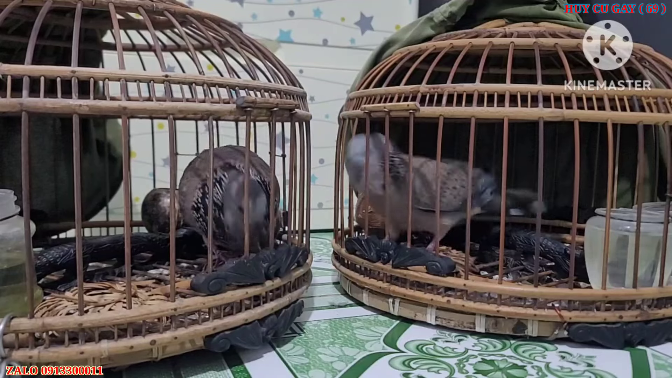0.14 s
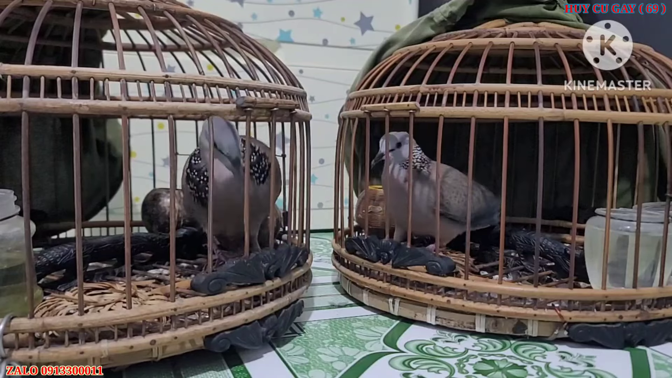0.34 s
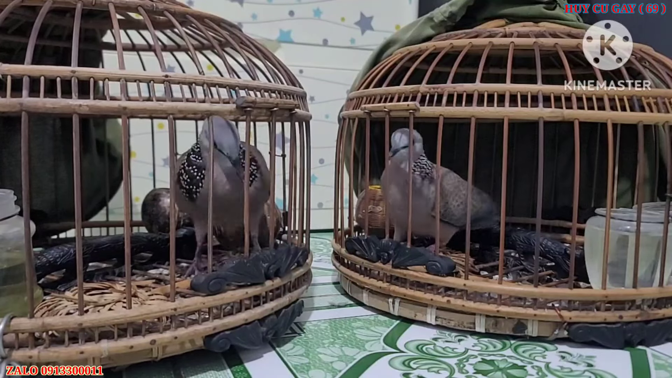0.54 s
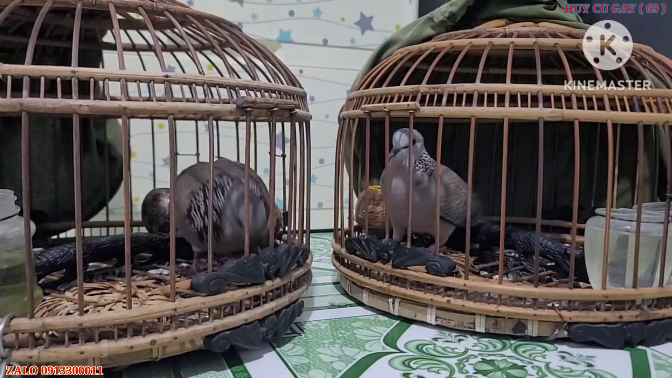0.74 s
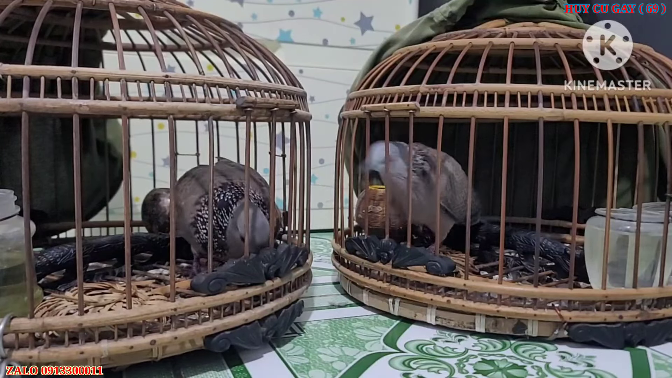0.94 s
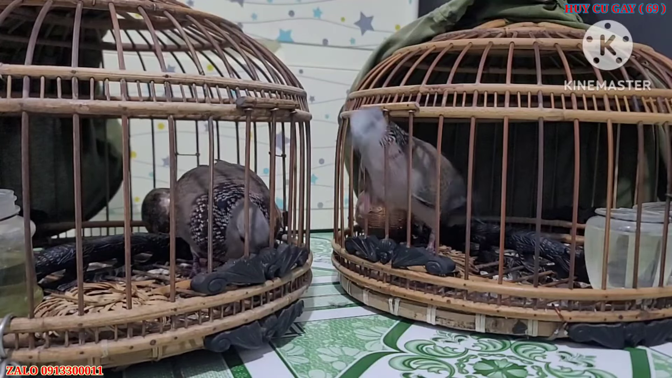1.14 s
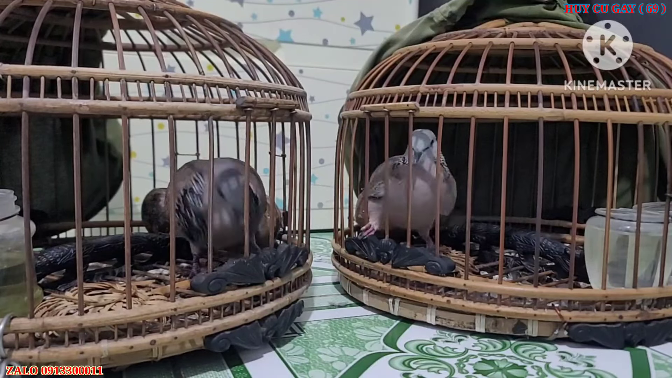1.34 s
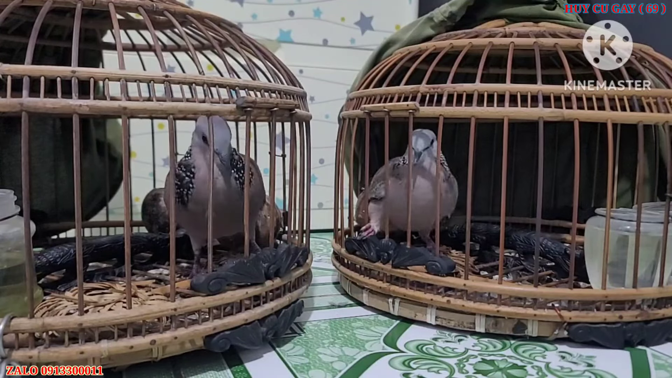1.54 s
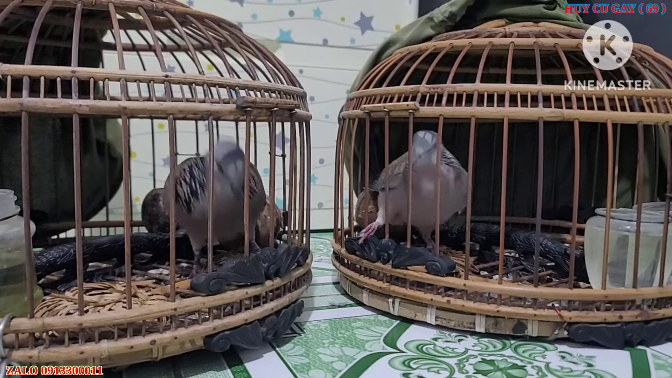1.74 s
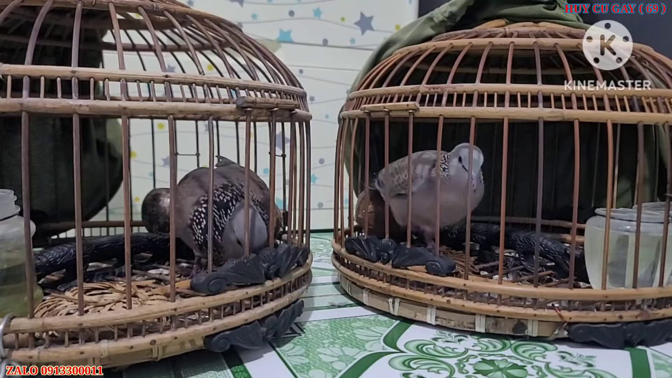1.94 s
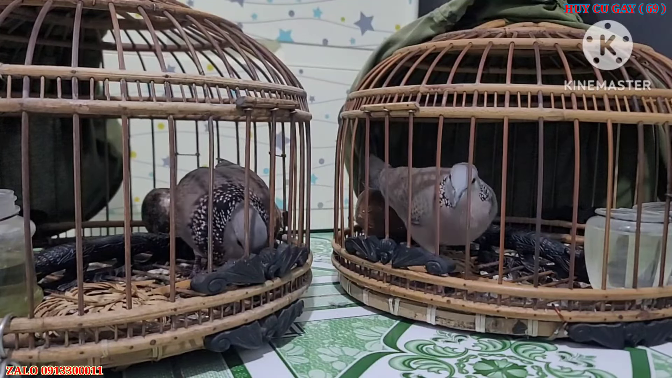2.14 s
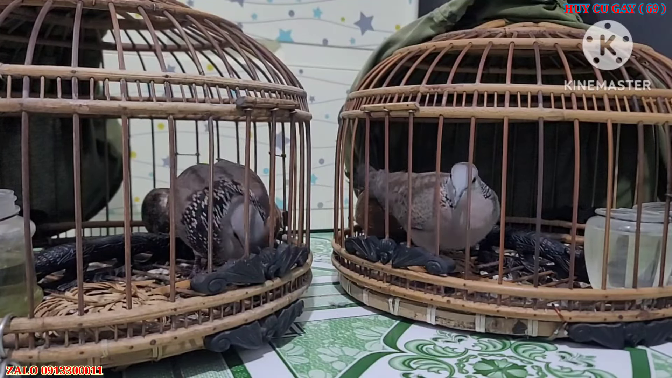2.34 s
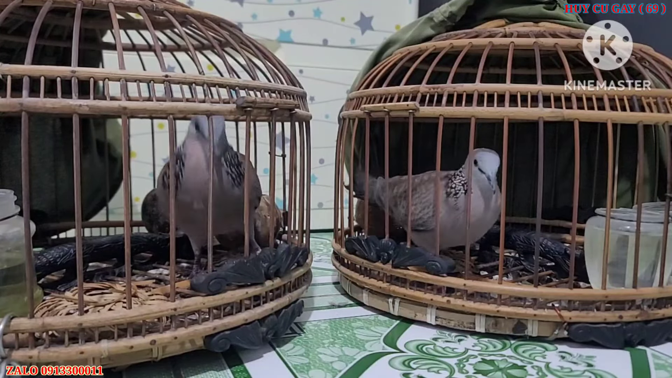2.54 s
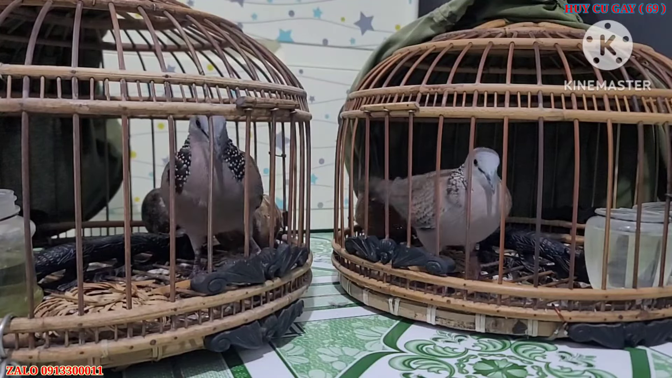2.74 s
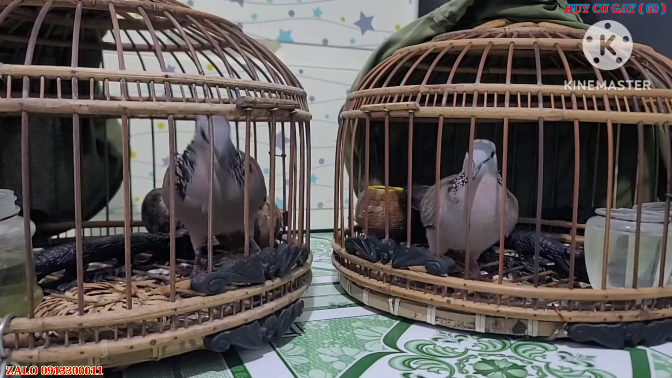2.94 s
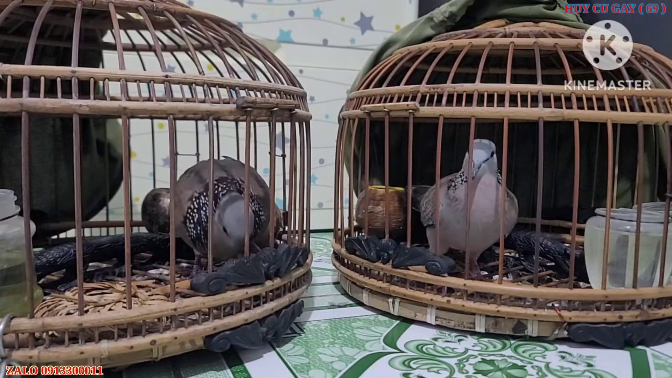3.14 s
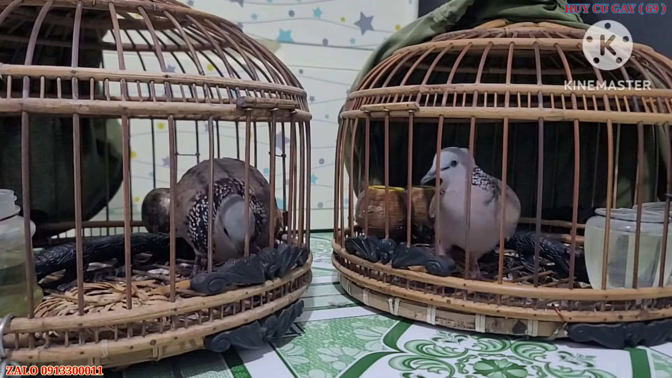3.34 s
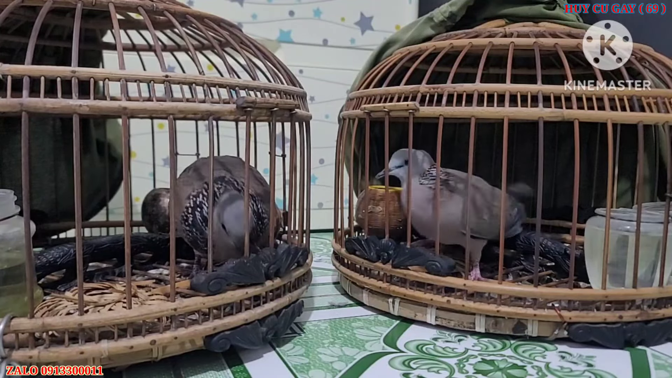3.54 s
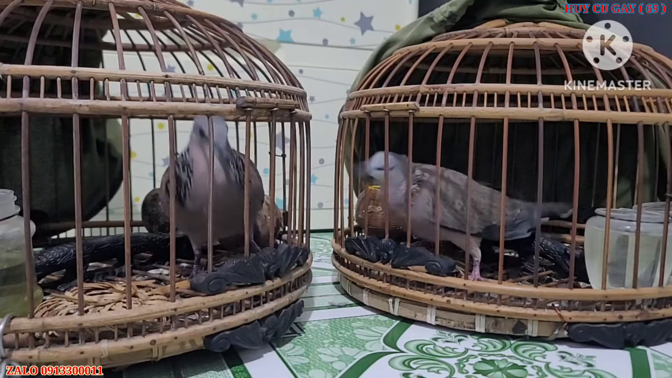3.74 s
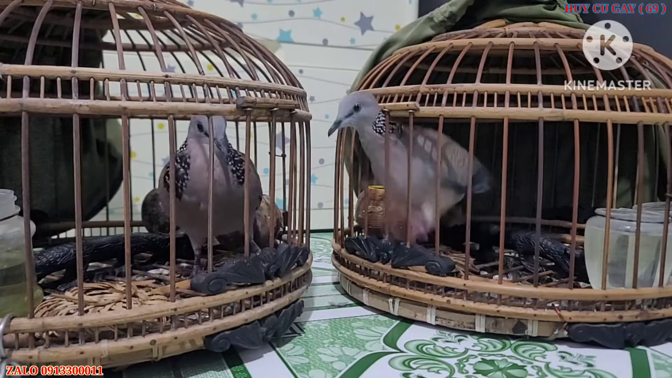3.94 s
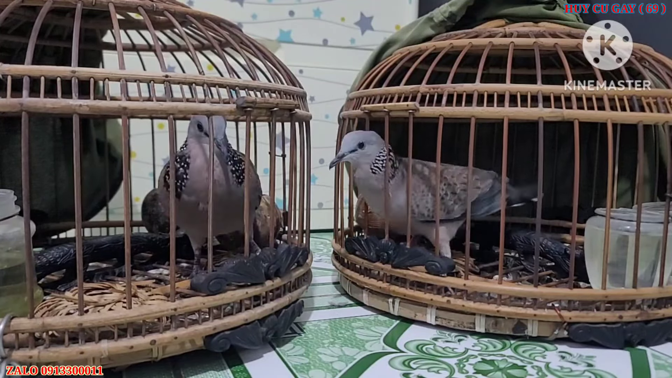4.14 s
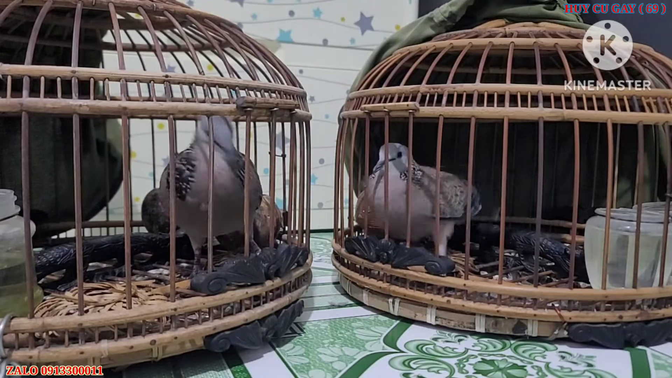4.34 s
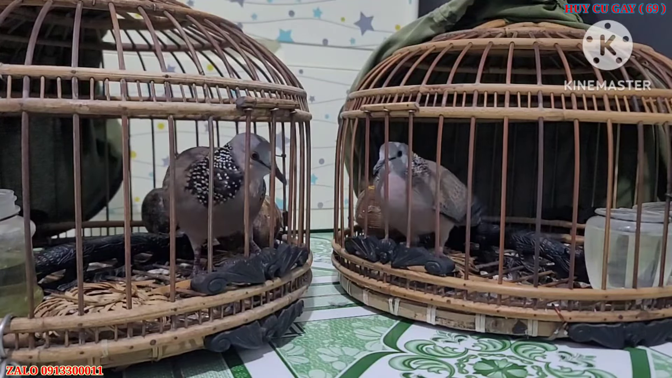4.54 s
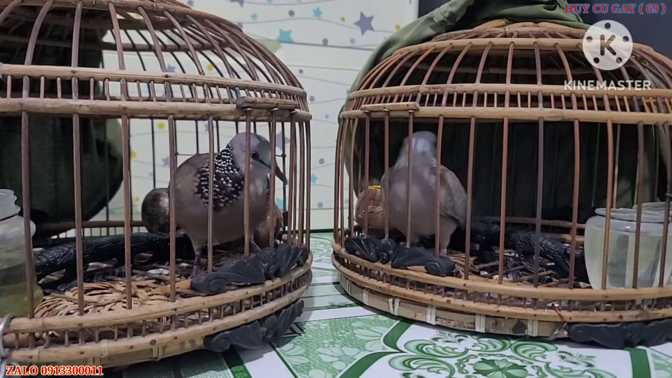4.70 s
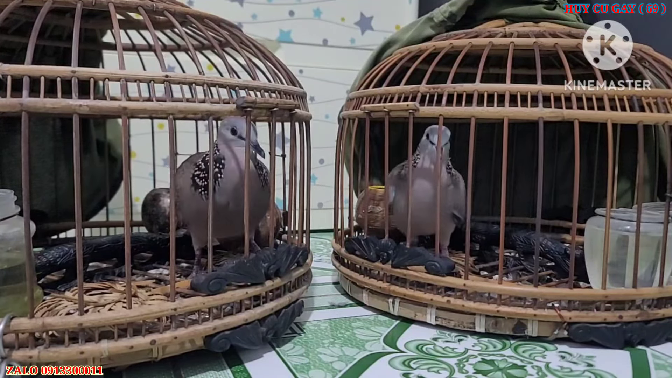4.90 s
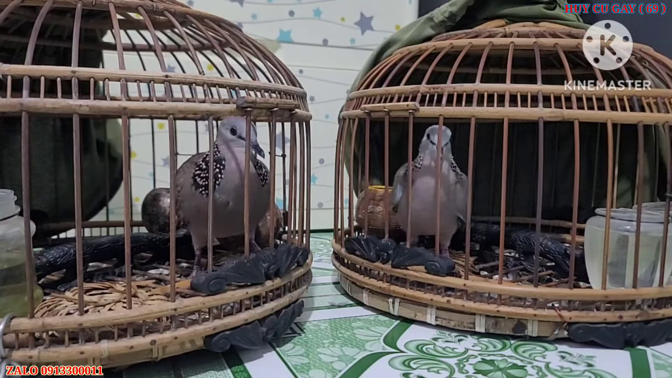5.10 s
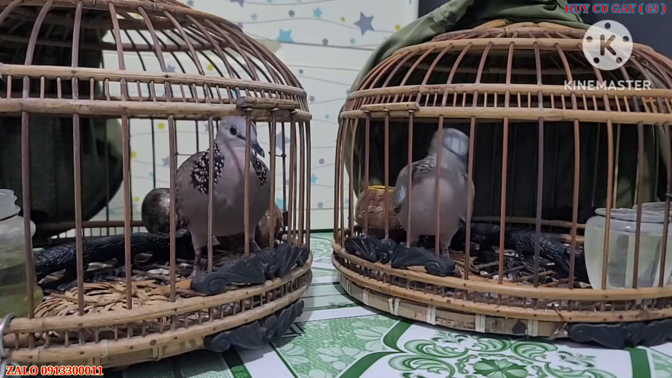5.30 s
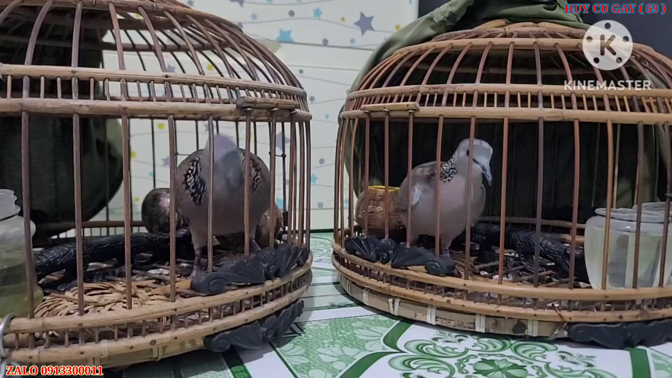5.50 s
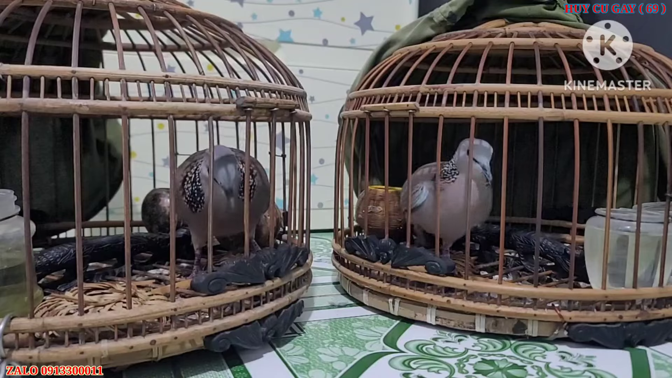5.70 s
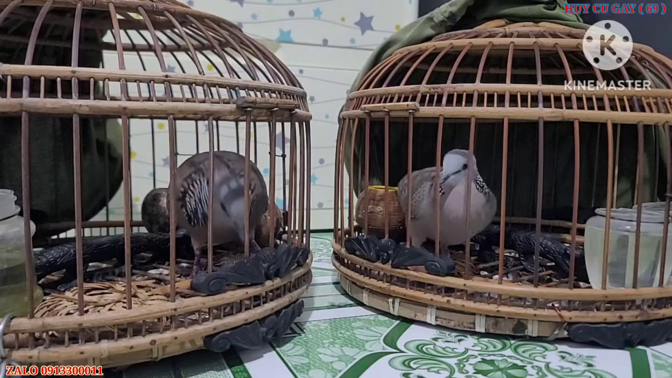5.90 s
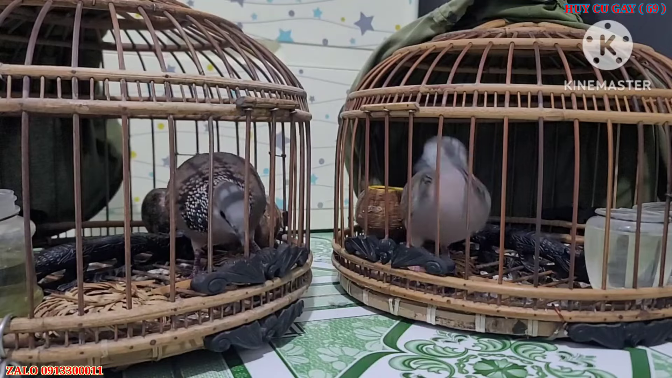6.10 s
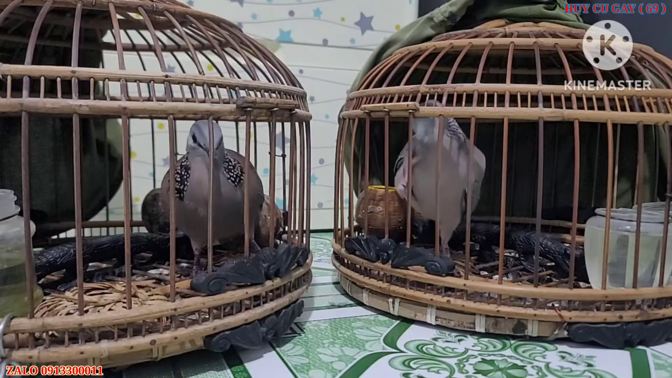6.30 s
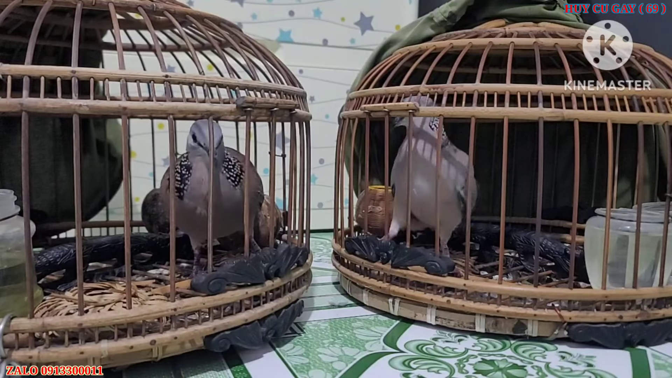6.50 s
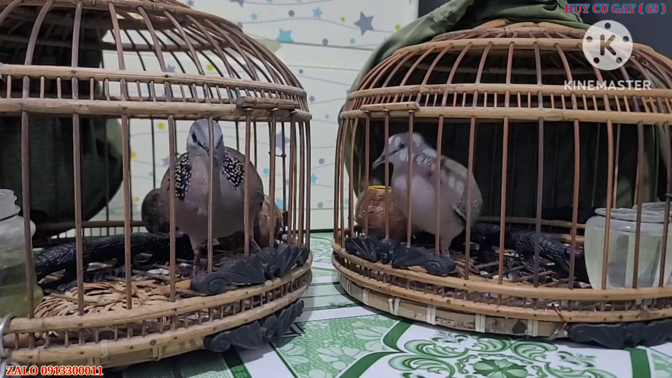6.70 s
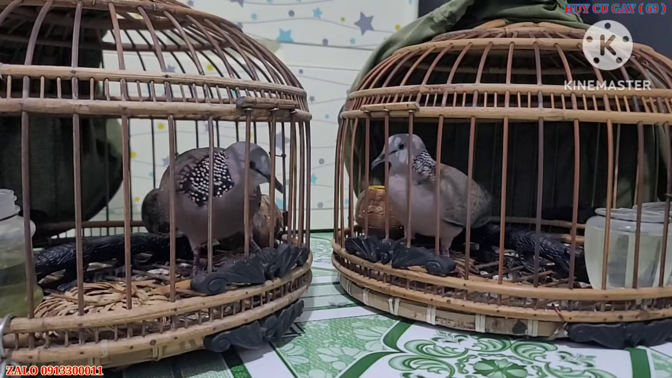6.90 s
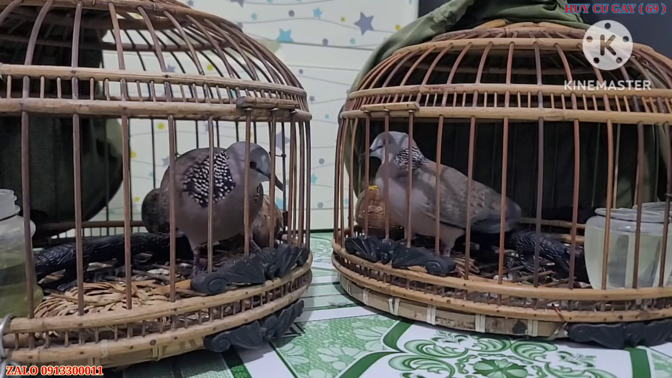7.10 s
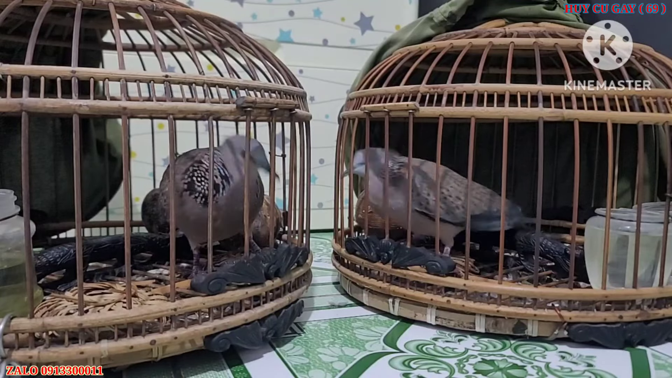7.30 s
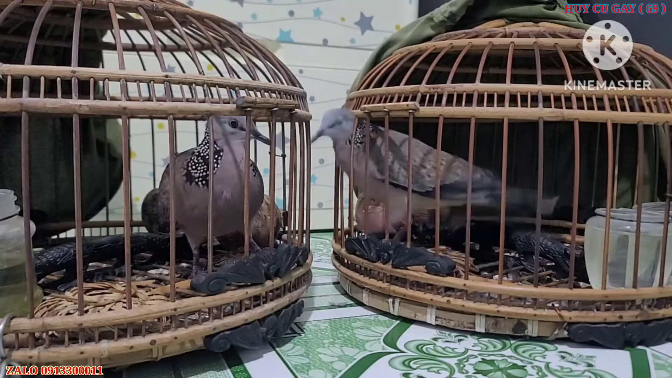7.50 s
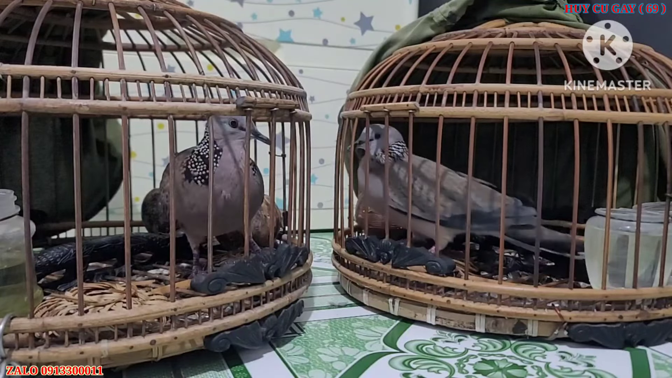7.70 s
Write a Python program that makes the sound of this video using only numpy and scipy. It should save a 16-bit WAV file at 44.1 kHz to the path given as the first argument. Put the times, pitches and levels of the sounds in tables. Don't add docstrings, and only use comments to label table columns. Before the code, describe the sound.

Close throaty dove coos, short then long and falling, give way to claw ticks, feather rustle and indoor knocks over faint motor hum and whine.

```python
import sys
import numpy as np
from scipy import signal
from scipy.fft import rfft, irfft, next_fast_len
from scipy.io import wavfile

SR = 44100
rng = np.random.default_rng(int(sys.argv[2]) if len(sys.argv) > 2 else 0)


def ratio(d):
    e = np.asarray(d, float) / 20
    return 10 ** e


def int16_out(signal):
    q = np.round(np.clip(np.atleast_2d(signal).T, -1, 1) * 32767)
    wavfile.write(sys.argv[1], SR, q.astype(np.int16))


N = 341769
T = np.arange(N) / SR

PURR_DEPTH, EDGE_DEPTH, SCOOP_S = .94, .6, .028
ATTACK_S, RELEASE_S, SILENT_DB = .013, .016, -36.5


def rms_one(x):
    return x / np.sqrt(np.mean(x ** 2) + 1e-20)


def in_time(rows):
    s, *columns = np.transpose(rows)
    return [np.interp(T, s, c) for c in columns]


def at_hz(points, hz):
    point_hz, value = np.transpose(points)
    return np.interp(np.log(hz + 1), np.log(point_hz), value)


def gate(start, end, rise=.011, fall=.0052):
    ramp = np.minimum((T - start) / rise + .5, (end - T) / fall + .5)
    return np.sin(np.pi / 2 * np.clip(ramp, 0, 1)) ** 2


def drift(rate):
    r = np.exp(-80 * np.pi * rate / SR)
    slow = signal.lfilter([1], [1, -2 * r, r * r], rng.standard_normal(N // 40 + 2002))[2000:]
    return np.interp(np.arange(N) / 40, np.arange(len(slow)), rms_one(slow))


def resonance(x, hz, width_hz):
    r = np.exp(-np.pi * width_hz / SR)
    zeros = np.array([1, 0, -1]) * (1 - r * r) / 2
    poles = [1, -2 * r * np.cos(2 * np.pi * hz / SR), r * r]
    return signal.lfilter(zeros, poles, x)


def band(x, low_hz, high_hz, order=2):
    return signal.sosfilt(signal.butter(order, [low_hz, high_hz], "band", fs=SR, output="sos"), x)


def diffuse(gain_of_hz):
    # freq_hz, likeness (0-1)
    likeness = [(60, 0.99), (215, 0.98), (300, 0.81), (640, 0.39), (1410, -0.0), (3100, 0.16),
                (6820, -0.05), (15000, 0.03)]
    size = next_fast_len(N)
    hz = np.arange(size // 2 + 1) * SR / size
    mid, side = rfft(rng.standard_normal((2, size)))
    alike = np.clip(at_hz(likeness, hz), 0, .999)
    pair = np.sqrt(1 + alike) * mid + np.sqrt(1 - alike) * side * [[1], [-1]]
    return rms_one(irfft(pair * gain_of_hz(hz), size)[:, :N])


def dove():
    # start_s, end_s, pitch_hz, first_pitch_hz, level_db
    short_notes = [
        (0.771, .968, 794.4, 570, -18.5),
        (1.9, 2.074, 789.7, 830, -18),
        (3.114, 3.299, 794, 545, -18.5),
    ]
    # start_s, purr_clears_s, voice_breaks_s, end_s, pitch_hz
    long_notes = [
        (-.06, 0.063, 0.25, 0.33, 852.5),
        (1.065, 1.193, 1.357, 1.419, 836.3),
        (2.175, 2.297, 2.459, 2.525, 833.6),
        (3.396, 3.584, 3.702, 3.731, 830.4),
    ]
    # time_s, depth (0-1)
    catches = [(0.104, 0.24), (.114, 0.91), (0.131, 0.89), (0.15, 1), (.165, 0.27), (0.18, 0.96),
               (.197, 0.75), (.215, 0.31), (0.259, .5), (.299, 0.99), (1.21, 0.42), (1.227, 1),
               (1.254, 0.84), (1.295, 0.73), (1.396, 0.5), (2.327, 0.96), (2.346, 0.7), (2.375, 0.97),
               (2.409, 1), (2.505, 0.32), (3.601, 0.39), (3.618, 0.73), (3.638, 0.47), (3.66, 0.87)]
    breaks = [(row[2], .45) for row in long_notes]
    catch_s, catch_depth = np.transpose(list(catches) + breaks)
    notes = [short_note(*row) for row in short_notes] + [long_note(*row) for row in long_notes]
    out, overtone, wobble = np.zeros(N), np.zeros(N), drift(60)
    for voice, effort in notes:
        tone, octave = syrinx(voice, effort, catch_s, catch_depth, wobble)
        out += tone
        overtone += octave
    already_singing = np.concatenate([out[999:0:-1], out])
    throat = resonance(band(already_singing, 430, 940, order=3), 734, 800)
    ahead = 110
    return np.pad(throat[999 + ahead:], (0, ahead)) + resonance(overtone, 910, 600)


def syrinx(voice, effort, catch_s, catch_depth, wobble):
    sag, regain_s, open_s, close_s = .37, .0047, .0017, .0025
    unsteady, spread_db, overtone_db = .2, 1.2, -40.5
    pitch, per_s, depth = in_time(voice)
    start, end = voice[0][0], voice[-1][0]
    turns = np.cumsum(per_s * (1 + unsteady * wobble)) / SR
    purr = np.flatnonzero(np.diff(np.floor(turns), prepend=-1))
    purr = purr[(T[purr] > start) & (T[purr] < end) & (depth[purr] > .15)]

    uneven = rng.uniform(.85, 1.2, 99)
    at = np.concatenate([[-9], T[purr], catch_s, [99]])
    deep = np.concatenate([[0], depth[purr] * uneven[:len(purr)], catch_depth, [0]])
    order = np.argsort(at)
    at, deep = at[order], np.clip(deep[order], 0, 1)
    last = np.searchsorted(at, T, side="right") - 1
    since, until = T - at[last], at[last + 1] - T
    opening = 1 - deep[last] * np.exp(-(since / open_s) ** 2)
    closing = 1 - deep[last + 1] * np.exp(-(until / close_s) ** 2)

    strength_db, detune = rng.standard_normal((2, 99))[:, last % 99]
    flat = sag * (.55 + .5 * depth) * deep[last]
    climb = 1 - flat * np.exp(-(since / regain_s) ** 1.5) + .04 * depth * np.clip(detune, -2, 1)
    phase = 2 * np.pi * np.cumsum(pitch * climb) / SR
    purr_db = depth * (4.5 + spread_db * strength_db)
    loud = ratio(in_time(effort)[0] + 5.5 + purr_db) * opening * closing * gate(start, end)
    return loud * np.cos(phase), loud * ratio(overtone_db + 10 * depth) * np.sin(2 * phase)


def short_note(start, end, hz, first_hz, db):
    rate, fall_s, swell_db = 102, .022, 4
    long = end - start
    voice = [(start, first_hz, rate, EDGE_DEPTH),
             (start + SCOOP_S, hz, rate, PURR_DEPTH),
             (start + .45 * long, hz, rate, PURR_DEPTH),
             (start + .65 * long, hz * 1.02, rate, EDGE_DEPTH),
             (end - fall_s, hz * .97, rate, EDGE_DEPTH),
             (end, hz * .74, rate, EDGE_DEPTH)]
    effort = [(start, SILENT_DB), (start + ATTACK_S, db - swell_db / 2),
              (end - RELEASE_S, db + swell_db / 2), (end, db - 3.5)]
    return voice, effort


def long_note(start, clears, breaks, end, hz):
    slow, fast = 70, 88
    switch_s, last_fall_s, clear_swell_s = .01, .025, .024
    droop_hz, droop_s, droop_power = 145.2, .295, 2.5
    s = np.arange(start + SCOOP_S, breaks - switch_s / 2, .005)
    droop = hz - droop_hz * ((s - start) / droop_s) ** droop_power
    rate = np.interp(s, [start, start + 2 * SCOOP_S], [slow, fast])
    depth = PURR_DEPTH - .12 * ((s - start) / (clears - start)) ** 2
    depth = depth * np.clip((clears - s) / switch_s + .5, 0, 1)
    depth = np.maximum(depth, .17)
    low = breaks + switch_s / 2
    voice = [(start, hz * .72, slow, EDGE_DEPTH),
             *zip(s, droop, rate, depth),
             (low, 632, slow, 0),
             (max(end - last_fall_s, low + .00064), 600, slow, 0),
             (end, 455, slow, 0)]
    clear_s = clears + clear_swell_s
    effort = [(start, SILENT_DB), (start + ATTACK_S, -19), (clears, -16),
              (clear_s, -11), (max(breaks - .06, clear_s + .001), -14),
              (breaks - .022, -10), (breaks - switch_s / 2, -10),
              (low, -14), (end - RELEASE_S, -19.5), (end, SILENT_DB)]
    return voice, effort


def wheeze():
    # start_s, length_s, first_pitch_hz, fall_hz_per_s, peak_db
    breaths = [
        (1.118, 0.24, 9250, 2600.5, -64),
        (2.219, 0.25, 9050, 2304, -63.5),
        (3.433, .2, 9050, 2298.5, -61.5),
        (7.596, 0.33, 7880, -800, -63),
    ]
    out, flutter = np.zeros(N), 1 + .012 * drift(80)
    for s, long, hz, fall, db in breaths:
        pitch = hz - fall * np.clip(T - s, 0, long)
        level_db = db - 10 * np.minimum(abs(2 * (T - s) / long - 1), 1)
        tone = np.sin(2 * np.pi * np.cumsum(pitch * flutter) / SR)
        out += ratio(level_db) * gate(s, s + long) * tone
    return out * (1 + .8 * drift(60))


def murmurs():
    # start_s, length_s, pitch_hz, level_db
    throat_sounds = [
        (2.862, 0.08, 380, -50.5),
        (6.454, 0.0345, 184.2, -38.5),
    ]
    out = np.zeros(N)
    for s, long, hz, db in throat_sounds:
        out += ratio(db + 8) * gate(s, s + long) * np.sin(2 * np.pi * hz * T)
    return out


def ticks():
    # time_s, peak_db, ring_hz
    right_cage = [(.0345, -63, 6070), (.0801, -51.5, 6130), (0.1286, -47, 6000), (.186, -43, 6020),
                  (.5297, -65, 7060), (1.31, -40, 6200), (1.416, -49, 6940), (1.456, -49.5, 12170),
                  (1.468, -44.5, 6220), (2.958, -59.5, 6120), (3.0356, -44.5, 6500), (3.682, -50, 6530),
                  (3.944, -43.5, 10300), (4.1121, -38, 7650), (4.3066, -45, 14300), (4.4315, -60.5, 7360),
                  (4.4767, -32.5, 14600), (6.447, -40, 6700), (6.556, -43, 6750), (6.5727, -44, 9700),
                  (7.5414, -38.5, 14700), (7.7333, -43, 12500)]
    # time_s, peak_db, ring_hz
    middle_cage = [(1.7644, -42.5, 14600), (1.957, -47, 6370), (1.999, -44.5, 10630), (2.7813, -52, 6200),
                   (3.4339, -49.5, 7260), (3.638, -51.5, 6330), (3.8845, -42, 6640), (3.9564, -25, 6520),
                   (4.047, -43, 9750), (4.075, -34.5, 10500), (4.0922, -34.5, 10900), (4.245, -42, 6100),
                   (4.452, -41, 8950), (6.5231, -55, 6100), (7.347, -51, 11100), (7.3731, -54, 6780),
                   (7.491, -57, 7250), (7.6036, -49.5, 7980), (7.7168, -56.5, 8250)]
    snap_s, ring_db = .0011, 2
    rows = [(*row, -4) for row in right_cage] + [(*row, 0) for row in middle_cage]
    out, t = np.zeros((2, N)), np.arange(600) / SR
    noises = rng.standard_normal((len(rows), 2, 600))
    for (s, db, hz, pan_db), noise in zip(rows, noises):
        snap = (noise + .56 * noise.sum(axis=0)) * np.exp(-t / snap_s)
        ring = resonance(snap, min(hz, 15000), 500)
        snap = band(snap, 3600, 17000) + ratio(ring_db) * 3 * ring
        snap /= abs(snap).max(axis=1, keepdims=True)
        snap *= ratio(db + 3 + np.array([[.5], [-.5]]) * pan_db)
        i = round(s * SR)
        out[:, i:i + 600] += snap[:, :N - i]
    return out


def knocks():
    # time_s, peak_db, treble_re_peak_db, decay_t60_s
    blows = [
        (4.645, -35, -29, 0.47),
        (4.944, -38.5, -33, 0.82),
        (4.9894, -40, -27, 0.45),
        (5.0938, -45, -40.5, 0.35),
        (5.3046, -29, -25, 0.38),
        (5.3844, -35.5, -41, 0.38),
        (5.609, -41.5, -40, 0.53),
        (5.9392, -20, -17.5, 0.43),
    ]
    # freq_hz, density_db_per_hz
    wash_colour = [(150, -38), (250, -9.5), (509, -10), (692, -10), (1470, 1.5), (1790, -7), (1970, -3),
                   (3250, -9.5), (7000, -19.5), (9100, -38), (15400, -120)]
    # freq_hz, width_hz, level_db
    board_modes = [(504, 115, 1.5), (1386, 19, -10.5), (2040, 99, -7), (2860, 62, -3), (3300, 74, -11)]
    body = diffuse(lambda hz: ratio(at_hz(wash_colour, hz)))
    modes = sum(ratio(db + 6.5) * resonance(body, hz, width) for hz, width, db in board_modes)
    body = rms_one(body + modes)
    treble = diffuse(lambda hz: hz ** 2 / (hz ** 3 + 4500 ** 3))
    low_power, high_power = np.zeros(N), np.zeros(N)
    for s, db, treble_db, t60 in blows:
        since = np.maximum(T - s, 0)
        swell = np.clip(since / .00062, 0, 1)
        low_power += (swell * ratio(db - 5 - 60 * (since / t60) ** 1.18)) ** 2
        high_power += (swell * ratio(db + 6 + treble_db - 80 * since / t60)) ** 2
    grain = ratio(1.2 * drift(60) + 2 * drift(400))
    return grain * (body * np.sqrt(low_power) + treble * np.sqrt(high_power))


def fan():
    # freq_hz, width_hz, level_db
    motor_lines = [(97.6, 4, -52.5), (151.2, 5, -55), (173, 3.2, -53), (193.63, 7.6, -48),
                   (363.3, 13, -58.5), (494, 5.2, -62.5), (540, 2.3, -59), (666, 9, -63), (1279, 87, -59),
                   (1394, 35, -66.5)]
    # freq_hz, width_hz, level_db
    whine_lines = [(2058, 23, -56), (2157.4, 80, -54.5), (2205, 69, -49)]
    out = ratio(-48 + .52 * drift(2)) * np.sin(2 * np.pi * 59.6 * T)
    for lines in (motor_lines, whine_lines):
        noise = diffuse(np.ones_like)
        for hz, width, db in lines:
            line = rms_one(resonance(resonance(noise, hz, width), hz, width))
            out = out + ratio(db) * line * ratio(1.8 * drift(8))
    return out * ratio(np.array([[-.4], [.4]]))


def air():
    # middle_s, held_s, rustle_db
    stirs = [(0.08, 0.21, -77), (1.33, 0.055, -78.5), (1.47, 0.036, -84.5), (1.99, 0.065, -83),
             (3.05, 0.089, -82), (3.46, 0.049, -76), (3.659, .06, -79), (3.97, 0.031, -70.5),
             (4.081, .05, -64.5), (4.28, 0.065, -78), (4.48, 0.038, -74), (4.67, 0.095, -79),
             (5.34, 0.12, -77), (5.82, .04, -82.5), (6.0, 0.11, -70), (6.6, 0.23, -76.5),
             (6.95, 0.35, -74.5), (7.45, .5, -82), (7.74, 0.025, -76.5)]
    # freq_hz, density_db_per_hz
    low_colour = [(15, -39.5), (25, -25.5), (65, -5), (118, -11.5), (185, -5.5), (268, -15.5), (351, -11.5),
                  (435, -16.5), (539, -16), (1700, -23), (2180, -21.5), (2600, -26.5), (3380, -60),
                  (5720, -120)]
    # freq_hz, density_db_per_hz
    upper_colour = [(2500, -1.5), (3300, -5.5), (3900, -10.5), (4500, -8), (5150, -10), (5400, -16.5),
                    (6400, -15), (6900, -16), (7300, -12), (7500, -18), (7700, -25.5), (9000, -36.5)]
    still_db, fade_db_per_s = -90, 221.5
    rustle_db = np.full(N, float(still_db))
    for s, held, db in stirs:
        outside_s = np.maximum(abs(T - s) - held / 2, 0)
        rustle_db = np.maximum(rustle_db, db - fade_db_per_s * outside_s)
    upper_db = -61.5 + .2 * (rustle_db - still_db)
    hiss = diffuse(lambda hz: ratio(at_hz(low_colour, hz)) * (hz < 2500))
    upper = diffuse(lambda hz: ratio(at_hz(upper_colour, hz)) * (hz > 2500))
    rustle = diffuse(lambda hz: np.clip((hz - 5000) / 4000, 0, 1) * (8000 / (hz + 1)) ** .88)
    grain_db = 1.5 * drift(30) + 3.5 * drift(300)
    return ratio(-43.5) * hiss + ratio(upper_db + 4.5) * upper + ratio(rustle_db + 13 + grain_db) * rustle


def room(x):
    t60_s, wall_cut_hz, gap_s = .42, 3700, .004
    t = np.arange(SR // 2) / SR
    clumps = ratio(1.2 * drift(200)[:len(t)])
    noise = rng.standard_normal((2, len(t))) * clumps
    dull = band(noise, 100, wall_cut_hz)
    decay = ratio(-60 * t / t60_s)
    echoes = (dull + (noise - dull) * decay) * decay * np.clip((t - gap_s) / .0047, 0, 1)
    echoes /= np.sqrt(SR * t60_s / np.log(1e6))
    return signal.fftconvolve(echoes, x[None], axes=1)[:, :N]


def scene():
    right_lag_s, left_db, room_db = .00013, -.5, -10
    bird = dove() + wheeze() + murmurs()
    clicks = ticks()
    direct = bird * ratio(np.array([[-.7], [.7]]))
    left, right = direct + room(ratio(room_db) * bird) + knocks() + fan() + air()
    near = np.array([ratio(left_db) * left, np.interp(T - right_lag_s, T, right)])
    return near + clicks + ratio(-4) * room(clicks.mean(axis=0))


def top_cut(x):
    return signal.sosfilt(signal.butter(12, 15700, fs=SR, output="sos"), x)


def record(dry):
    top = signal.cheby2(12, 60, 15900, fs=SR, output="sos")
    mix = signal.sosfilt(top, dry)
    return top_cut(mix)


dry = scene()
out = record(dry)
int16_out(out)
```